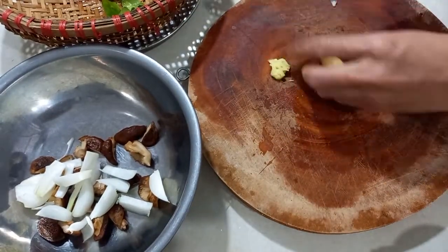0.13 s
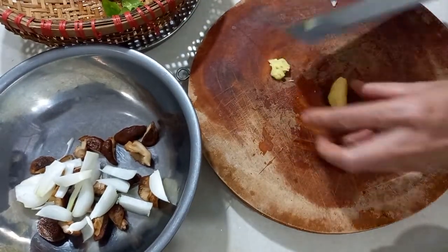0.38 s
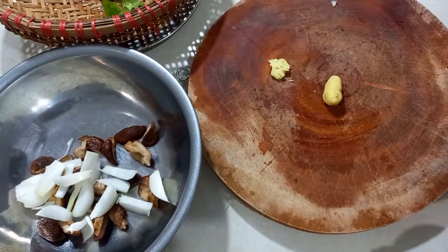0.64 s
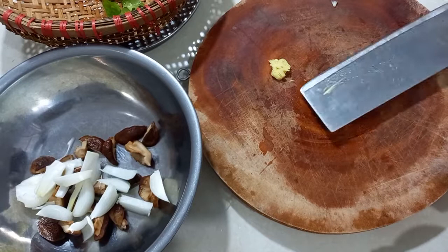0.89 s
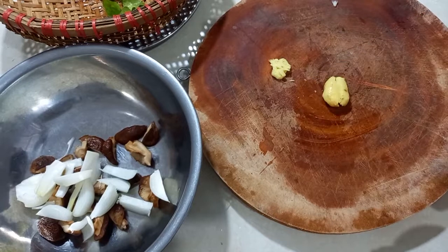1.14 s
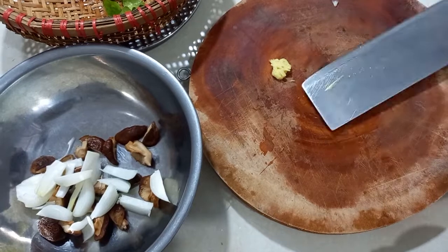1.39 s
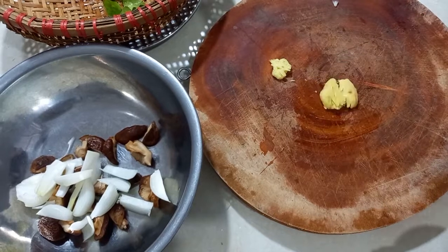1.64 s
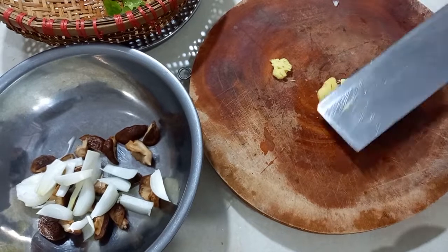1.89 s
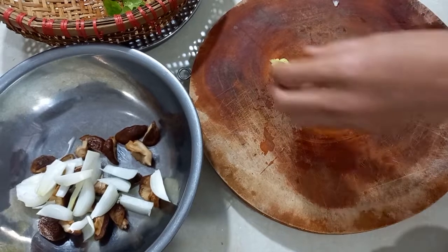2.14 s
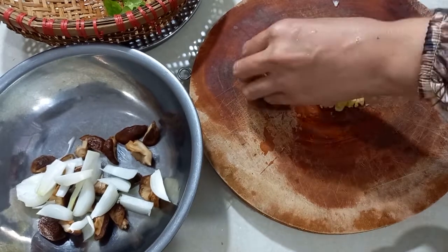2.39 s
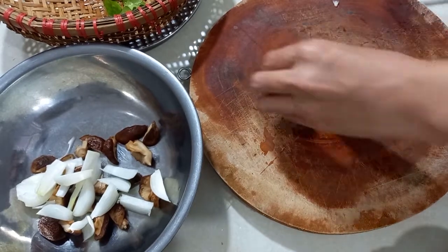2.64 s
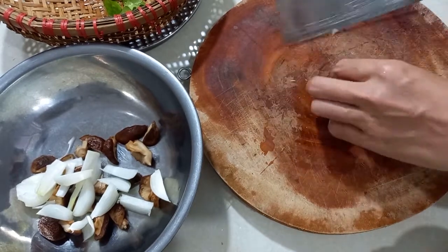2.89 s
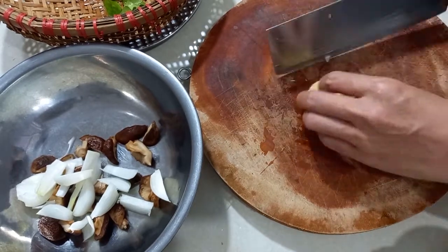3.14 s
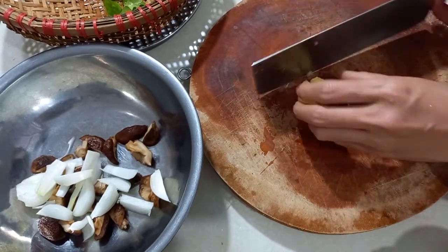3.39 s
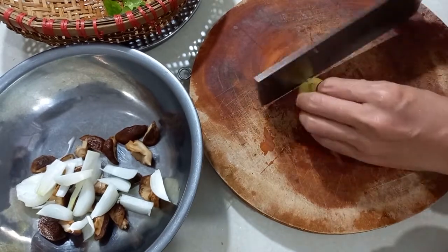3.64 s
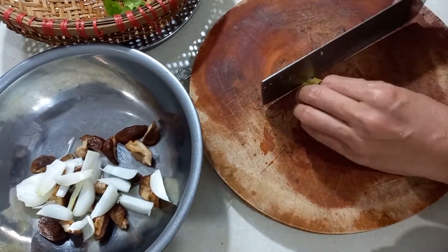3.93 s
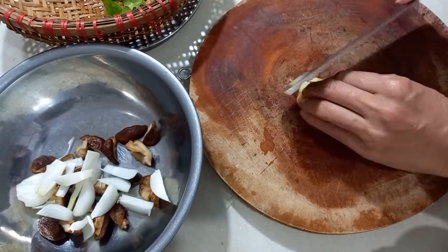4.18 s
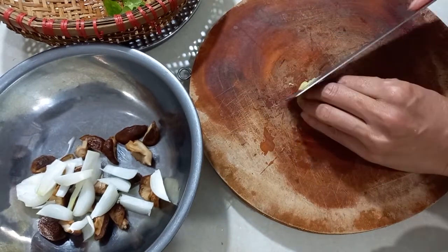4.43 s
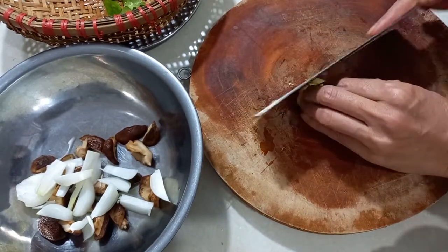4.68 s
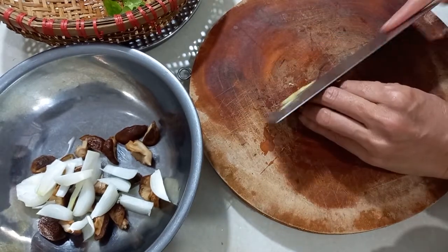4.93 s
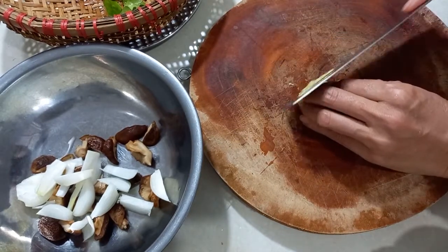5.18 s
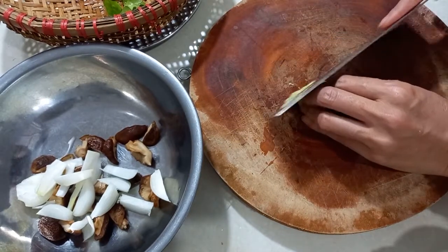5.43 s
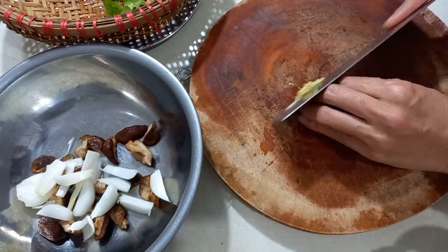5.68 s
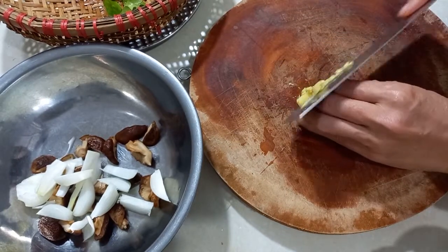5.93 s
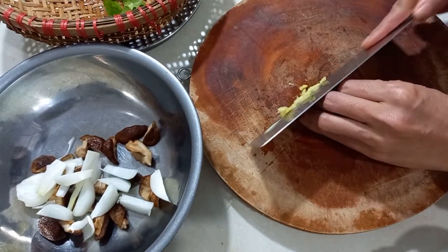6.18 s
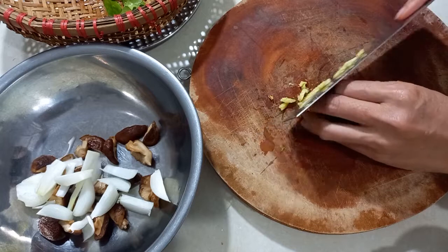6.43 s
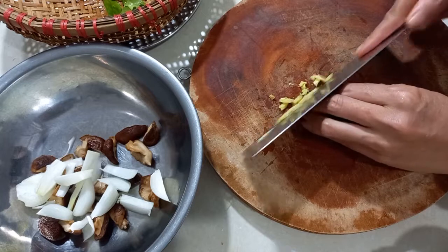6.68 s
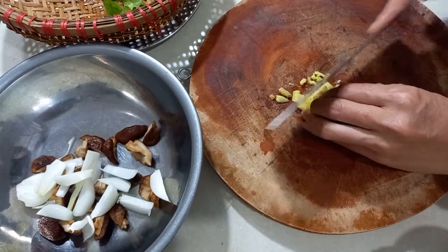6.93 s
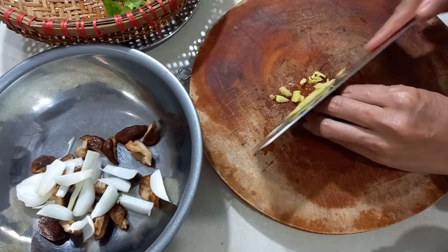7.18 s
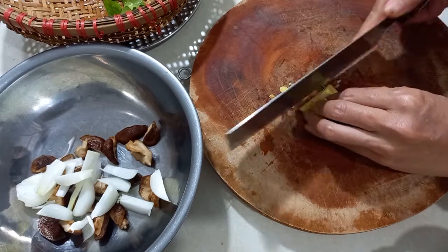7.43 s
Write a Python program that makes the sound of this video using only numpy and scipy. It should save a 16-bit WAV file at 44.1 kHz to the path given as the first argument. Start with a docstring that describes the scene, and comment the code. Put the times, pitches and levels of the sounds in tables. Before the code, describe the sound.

A close microphone in a hard, echoing home kitchen picks up a heavy blade smacking root three times, booming through the worktop. Then come irregular light taps and scuffing fingers, a few tiny crackles, and deliberate slices about half a second apart, each a crisp crunch into a woody knock. Behind it, engines hum, tyres hiss and low rumble swells, strongest near the end.

```python
"""A cleaver works on ginger on a thick wooden board in a hard-walled home kitchen.
Three slaps with the flat of the blade crush the root (ringing steel and wood, noise spray, worktop thump),
fingers wipe the blade (shaped noise), then slow cuts crunch through the fibres (random snaps), with knocks
on the wood (struck modes). Engines, tyres and rumble (wavering tones, noise) drone outside."""
import sys
import numpy as np
from scipy import signal
from scipy.fft import rfft, irfft
from scipy.io import wavfile

SR = 44100
rng = np.random.default_rng(int(sys.argv[2]) if len(sys.argv) > 2 else 0)


def store_wav(level_fs):
    """Save 16-bit WAV to argv[1]."""
    pcm = np.round(np.clip(np.atleast_2d(level_fs), -1, 1) * 32767)
    wavfile.write(sys.argv[1], SR, pcm.T.astype(np.int16))


def ratio_of_db(decibels):
    """Turn decibels (scalar or array-like) into linear amplitude factors; 0 dB maps to 1."""
    return 10 ** (np.asarray(decibels, float) / 20)


N = 333837


def rms_one(x):
    """Scale to unit rms."""
    return x / np.sqrt(np.mean(x ** 2) + 1e-20)


def in_time(rows):
    """Columns of a curve at every sample; first column is time_s."""
    s, *columns = np.transpose(rows)
    return [np.interp(np.arange(N) / SR, s, c) for c in columns]


def at_hz(points, hz):
    """Read a spectrum on a log-frequency axis."""
    points = np.array(points)
    return np.interp(np.log(hz), np.log(points[:, 0]), points[:, 1])


def filtered(x, order, hz, kind):
    """Butterworth filter."""
    return signal.sosfilt(signal.butter(order, hz, kind, fs=SR, output="sos"), x)


def equalised(x, spectrum):
    """Signal weighted by a spectrum in dB."""
    hz = np.arange(N // 2 + 1) * SR / N + 1
    return irfft(rfft(x) * ratio_of_db(at_hz(spectrum, hz)), N)


def colour(x, spectrum):
    """Noise shaped to a spectrum, rms 1."""
    return rms_one(equalised(x, spectrum))


# left-right correlation of noise: pitch_hz, correlation
LIKENESS = [(60, 0.94), (180, 0.88), (550, 0.29), (1650, 0.0), (4970, -0.01), (15000, 0.03)]


def stereo_noise(length):
    """White noise whose channels agree in the bass and part in the treble."""
    mid, side = rfft(rng.standard_normal((2, length)))
    hz = np.arange(len(mid)) * SR / length + 1
    alike = np.clip(at_hz(LIKENESS, hz), -1, 1)
    shared = np.sqrt(1 + alike) * mid
    apart = np.sqrt(1 - alike) * side * [[1], [-1]]
    return irfft(shared + apart, length) / np.sqrt(2)


def drift(rate_hz):
    """Slow chance: noise through two equal low-pass poles, rms 1."""
    r = np.exp(-2 * np.pi * rate_hz / SR)
    slow = signal.lfilter([1], [1, -2 * r, r * r], rng.standard_normal(N + SR))
    return rms_one(slow[SR:])


def waver(hz, rate_hz):
    """Tone whose height and phase wander, a little differently left and right; mid rms 1."""
    turn = 2 * np.pi * np.cumsum(hz) / SR
    mid, side = (drift(rate_hz) * np.cos(turn) + drift(rate_hz) * np.sin(turn) for part in range(2))
    return mid + ratio_of_db(-12) * side * [[1], [-1]]


def ring(drive, hz, t60_s):
    """Two-pole resonator: a unit click sets a sine of height 1 ringing."""
    r, w = ratio_of_db(-60 / (t60_s * SR)), 2 * np.pi * hz / SR
    return signal.lfilter([0, np.sin(w)], [1, -2 * r * np.cos(w), r * r], drive + 1e-18)


def clicks(s, db):
    """Single samples at given moments."""
    out = np.zeros(N)
    np.add.at(out, np.round(np.asarray(s) * SR).astype(int), ratio_of_db(db))
    return out


def dying(drive, t60_s):
    """Envelope that jumps at each click and decays."""
    return signal.lfilter([1], [1, -ratio_of_db(-60 / (t60_s * SR))], drive + 1e-18)


def grains(per_s, spread_db):
    """Dense random snaps of uneven size, rms 1."""
    sizes = ratio_of_db(spread_db * np.minimum(rng.exponential(1, (2, N)), 5))
    signs = rng.choice([-1, 1], (2, N))
    return rms_one(sizes * signs * (rng.random((2, N)) < per_s / SR))


TOUCH_S = .003


def strokes(rows, fade_db_per_s):
    """Strokes set in over TOUCH_S, move evenly in dB, then fade; returns gain and the shares passed on."""
    t, out = np.arange(N) / SR, 0
    for start_s, end_s, start_db, end_db, *share_db in rows:
        level_db = np.interp(t, [start_s, end_s], [start_db, end_db])
        level_db = level_db - fade_db_per_s * np.maximum(t - end_s, 0)
        gain = np.clip((t - start_s) / TOUCH_S, 0, 1) * ratio_of_db(np.maximum(level_db, -200))
        out = out + gain * ratio_of_db([0, *share_db])[:, None]
    return out


# street levels: time_s, drone_db, rumble_rel_db
STREET = [(0, -66, -73), (.12, -59, -68.5), (.5, -70, -62.5), (.72, -45, -59.5), (2.45, -69, -71.5),
          (2.7, -63, -69), (3.3, -59, -61.5), (3.73, -45.5, -63.5), (4.06, -60, -67.5), (4.4, -47.5, -61.5),
          (4.65, -50, -57.5), (5.15, -66, -61), (5.45, -53, -53), (5.85, -43.5, -57.5), (6.27, -50, -59.5),
          (6.6, -37, -56), (6.82, -52.5, -59), (7.15, -31, -47.5), (7.57, -68, -46)]
# noise levels: time_s, tyre_db, treble_hiss_db
AIR = [(0, -77.5, -88), (.4, -72.5, -76), (.74, -64.5, -59), (2.5, -77.5, -73), (3.9, -73, -75),
       (4.3, -69, -71.5), (5.5, -86.5, -69), (6.45, -79, -66.5), (6.95, -59.5, -71), (7.57, -64, -72)]
# passing engine: time_s, pitch_hz, level_rel_db
ENGINE = [(6.8, 295, -83), (7.14, 295, -46), (7.38, 296, -50), (7.57, 322, -56)]
# passing engine's partials: multiple, level_rel_db, waver_hz
ENGINE_ORDERS = [(.51, 9.5, 2.4), (1.0, 6.5, 2.7), (1.15, -7, 3.2)]
# idling engine that swells, then fades: time_s, level_rel_db
IDLE = [(0, -71), (.2, -59), (.7, -52.5), (2.2, -59.5), (2.6, -72.5)]
# idling engine's partials: multiple of firing rate, level_rel_db
IDLE_ORDERS = [(3, -3), (4, -3.5), (5, 5.5), (6, -1)]
# rumble spectrum: pitch_hz, level_rel_db
RUMBLE = [(18, -61), (30, -39), (46, -24.5), (123, -7.5), (156, -18.5), (288, -26), (328, -23.5),
          (900, -54.5), (1170, -72), (1980, -120)]
# tyre spectrum: pitch_hz, level_rel_db
TYRES = [(350, -44), (600, -7.5), (685, -7), (927, -15.5), (1700, -10.5), (2640, -19.5), (5000, -29.5),
         (6500, -56.5), (11000, -120)]
# treble hiss spectrum: pitch_hz, level_rel_db
HISS = [(2500, -38.5), (3500, -14), (6500, -11.5), (7700, -9), (8400, -4), (11000, -13), (13000, -10.5),
        (15800, -18.5)]
DRONE_HZ, DRONE_WANDER_HZ, IDLE_FIRING_HZ = 122.7, 2.5, 26.3


def street():
    """Wavering engine drone, idling and passing engine tones; noise for rumble, tyres and treble hiss."""
    drone_db, rumble_db = in_time(STREET)
    tyre_db, hiss_db = in_time(AIR)
    engine_hz, engine_db = in_time(ENGINE)
    idle_db, = in_time(IDLE)
    fade_in = np.clip((np.arange(N) / SR - ENGINE[0][0]) / .1, 0, 1)
    engine = fade_in * sum(ratio_of_db(engine_db + db) * waver(k * engine_hz, rate_hz)
                           for k, db, rate_hz in ENGINE_ORDERS)
    idle = sum(ratio_of_db(idle_db + db) * waver(np.full(N, k * IDLE_FIRING_HZ), 1.5) for k, db in IDLE_ORDERS)
    rumble = ratio_of_db(rumble_db + 12.0) * colour(stereo_noise(N), RUMBLE)
    tyres = ratio_of_db(tyre_db) * colour(stereo_noise(N), TYRES)
    hiss = ratio_of_db(hiss_db) * colour(stereo_noise(N), HISS)
    drone = ratio_of_db(drone_db) * waver(DRONE_HZ + DRONE_WANDER_HZ * drift(1.5), 8.0)
    return drone + engine + idle + rumble + tyres + hiss


# flat of the blade on the root: start_s, slap_rel_db, thump_rel_db, spray_delay_s
SLAPS = [(0.761, 6.5, 3.5, 0.0046), (1.284, 3, 4.5, 0.0052), (1.744, 6.5, 2, 0.0023)]
# blade modes: pitch_hz
BLADE_HZ = [690, 1100, 2164, 2255, 2375, 2650, 2834, 3418, 5720, 5684, 7243, 8240, 9185, 10100, 10885,
            11780, 13500, 14100]
# same modes: struck_rel_db, wiped_rel_db, longest_t60_s
BLADE = [(-0.5, -21.5, 0.037), (-12.5, -29, 0.049), (-7, -17, .2), (-3.5, -23, .05), (-7.5, -5, .1),
         (-7, -5, .05), (-8.5, -13, .1), (-11, -18.5, .08), (-8.5, -21, .2), (-11, -16.5, .15),
         (-13.5, -22.5, .08), (-9.5, -21.5, .1), (-4.5, -4, .06), (-9, -26, 0.087), (-7.5, -22, .11),
         (-4, -6, .1), (-4, -4, 0.051), (-12, -3.5, .07)]
GRIP_CYCLES = 800  # the grip limits each mode's t60 to this many cycles


def blade(wiping):
    """Slaps rattle the hand-damped steel with short noise bursts; rubbing stirs the same modes."""
    s, slap_db, _, delay_s = np.transpose(SLAPS)
    rattle = dying(clicks(s + delay_s, slap_db - 18.5), 0.068) * stereo_noise(N)
    # a previous slap is just dying away
    earlier = dying(clicks([0], -80.5), 0.39) * rng.standard_normal(N)
    out = ring(earlier, 2280, 0.028)
    for hz, (struck_db, wiped_db, t60_s) in zip(BLADE_HZ, BLADE):
        drive = ratio_of_db(struck_db) * rattle + ratio_of_db(wiped_db) * wiping
        out = out + ring(drive, hz, min(t60_s, GRIP_CYCLES / hz))
    return out


# spray spectrum: pitch_hz, density_rel_db_per_hz
SPRAY = [(88, -36), (150, -7.5), (464, -9), (1140, -0.5), (1520, -6), (2210, -4.5), (2480, -1.5),
         (2680, -4), (12000, -12.5), (15800, -3)]
# worktop modes: pitch_hz, level_rel_db, t60_s, first_swing_sign
WORKTOP = [(61, -2.5, 0.19, 1), (83, 0, 0.15, -1), (128.4, -9.5, 0.37, 1), (235.5, -13.5, 0.76, 1)]
THUMP_LAG_S = 0.0015  # the worktop shakes the right side a little later
FIRST_SPRAY_REL_DB = -7  # the skin splits at first contact, before the main spray


def slaps():
    """The blade knocks the wood, the root bursts in a spray of noise, and the whole worktop thumps."""
    s, slap_db, thump_db, delay_s = np.transpose(SLAPS)
    wood = sum(swing * ring(clicks(s, slap_db + mode_db), hz, .02)
               for hz, mode_db, swing in [(1100, -11.0, -1.2), (2460, -6.5, -0.38)])
    splits = clicks(s + delay_s, slap_db + 5.5) + clicks(s, slap_db + FIRST_SPRAY_REL_DB)
    spray = dying(splits, 0.28) * colour(stereo_noise(N), SPRAY)
    push = filtered(clicks(s + 0.0014, thump_db) + 1e-18, 2, [45, 200], "band")
    thump = sum(np.sign(swing) * ratio_of_db(db) * ring(push, hz, t60_s) for hz, db, t60_s, swing in WORKTOP)
    sides = np.array([thump, np.roll(thump, round(THUMP_LAG_S * SR))])
    return wood + spray + sides * ratio_of_db([[2.0], [-2.5]])


# edge or heel on the board: start_s, peak_rel_db, weight_db, hardness_db
KNOCKS = [(2.594, -21, 8.5, 20), (2.825, -35, 17, 0.5), (2.866, -18.5, 10.5, 8), (2.913, -14.5, 1.5, -1),
          (3.062, -43, -5, -2), (3.09, 0, -13.5, -21), (3.282, -27, 20, -12), (3.298, -12.5, 4, -17),
          (3.326, -23.5, 16.5, -21), (3.341, -17, 7, -8), (4.471, 7, 0, -9), (4.911, -21, 20, -10),
          (5.233, 11, 1, -12.5), (5.674, 4, 2, -12), (6.112, -12, 12.5, 1), (6.637, -19.5, 18.5, 16.5),
          (7.198, -15, 17.5, 6.5), (7.541, -44, 13, 1)]
# board modes: pitch_hz, level_rel_db, t60_s
BOARD = [(231.4, -13, 0.13), (476.7, -4, 0.03), (656.3, -3, 0.038), (926, -11, 0.11), (1004, 2, 0.026),
         (1076, -6.5, 0.023), (1217, -5.5, 0.0083), (1625, -16, 0.048), (1832, -18.5, 0.023),
         (2090, -14, 0.016), (3060, -21.5, 0.0054), (4310, -41, 0.014)]
# direction of each board mode's first swing: sign
BOARD_SIGNS = [1, -1, 1, -1, -1, -1, 1, -1, 1, -1, 1, -1]
# clatter spectrum: pitch_hz, level_rel_db
CLATTER = [(600, -25), (1500, 3), (2300, -8), (3800, -18.5), (6000, -27), (15000, -32)]


def board(rubbing):
    """Heavy knocks favour the low modes, hard ones the high; rubbing drives the same modes."""
    s, peak_db, weight_db, hard_db = np.transpose(KNOCKS)
    chance_db, out = rng.normal(0, 1.5, (len(s), len(BOARD))), np.zeros(N)
    for k, (hz, mode_db, t60_s) in enumerate(BOARD):
        low, high = np.clip(np.log2(900 / hz), 0, 1), np.clip(np.log2(hz / 1200), 0, 1)
        blows = clicks(s, peak_db - 10 + weight_db * low + hard_db * high + chance_db[:, k])
        # wood yields, so the push builds up
        push = filtered(blows + rubbing + 1e-18, 4, max(1.4 * hz, 1400), "low")
        out += BOARD_SIGNS[k] * ratio_of_db(mode_db) * ring(push, hz, t60_s)
    crack = dying(clicks(s + 0.00055, peak_db + hard_db - 22.0), 0.006)
    crack = crack * colour(rng.standard_normal(N), CLATTER)
    return filtered(out, 2, 170, "high") + crack


def shudder():
    """Decaying envelope of the board shuddering on the worktop after each knock."""
    s, peak_db = np.transpose(KNOCKS)[:2]
    return dying(clicks(s, peak_db - 28.5), 0.37)


# fingers on blade and root: start_s, leave_s, start_db, leave_db, to_blade_rel_db, to_board_rel_db
WIPES = [(2.594, 2.61, -52.5, -55, -0.5, 20.5), (2.69, 2.804, -69, -44, 9, -6.5),
         (3.07, 3.2, -65.5, -67, -4, 1), (3.215, 3.3, -65, -64.5, 2, 2),
         (3.47, 3.5, -66.5, -61.5, -10, -24), (3.6, 3.652, -76, -62, -22, -16)]


def wipes():
    """Finger friction envelopes: rustle, share to the blade, share to the board."""
    return strokes(WIPES, fade_db_per_s=259)


# edge breaks skin, fingers unstick: start_s, peak_rel_db, t60_s
TICKS = [(3.485, -42.5, 0.046), (3.573, -45, 0.03), (3.5995, -49, 0.025), (3.6202, -44.5, 0.03),
         (3.6429, -38, 0.031), (3.71, -38.5, 0.03), (3.7706, -47, 0.035), (4.0946, -46.5, 0.014),
         (4.37, -38.5, 0.037), (4.8416, -27, 0.068), (5.1994, -22.5, 0.03), (5.4485, -41, 0.036),
         (5.5962, -33.5, 0.027), (5.9986, -27, 0.05), (7.002, -36, 0.025)]
# crunch spectrum: pitch_hz, level_rel_db
CRUNCH = [(900, -25), (1500, 1.5), (2200, -5), (3300, -8.5), (4600, -6.5), (6300, -8.5), (7600, -6),
          (8400, 0.5), (9400, -6.5), (11900, -2), (15800, -4.5)]


def ticks():
    """Short bright crackles of dense random snaps, and their envelope."""
    envelope = sum(dying(clicks([s], peak_db - 4.0), max(t60_s, .004)) for s, peak_db, t60_s in TICKS)
    crackle = filtered(colour(grains(10000, 4.4), CRUNCH), 2, 6800, "high")
    return envelope * crackle, envelope


# edge crushes fibres on its way to the board: start_s, end_s, start_db, end_db, to_board_rel_db
CUTS = [(4.395, 4.472, -57.5, -28, -24), (4.865, 4.91, -45.5, -24, -3.5), (5.212, 5.236, -53.5, -26, -24),
        (5.622, 5.676, -35.5, -26.5, -1), (6.054, 6.113, -32, -27, -3), (6.562, 6.605, -38.5, -25.5, -2),
        (7.106, 7.17, -35.5, -22, -5)]
PRESS_S, PRESS_FIRST_REL_DB, PRESS_LAST_REL_DB = .055, -28, -14.5  # levels relative to the cut's start


def cuts():
    """The edge presses on the skin, then crushes the fibres: envelope and share to the board."""
    presses = [(s - PRESS_S, s, db + PRESS_FIRST_REL_DB, db + PRESS_LAST_REL_DB, share_db)
               for s, _, db, _, share_db in CUTS]
    return strokes(CUTS + presses, fade_db_per_s=1816)


# softer crunch or rub following each cut, sometimes before the knock:
# start_s, end_s, start_db, end_db, to_board_rel_db
AFTER_CRUNCHES = [(4.475, 4.575, -49.5, -33.5, -5.5), (4.912, 4.992, -33.5, -38, -3.5),
                  (5.24, 5.348, -46, -40.5, 4), (5.68, 5.72, -41.5, -34.5, -17),
                  (6.115, 6.192, -36.5, -40, -9.5), (6.605, 6.635, -37.5, -29, -3),
                  (7.175, 7.205, -28, -28, -4)]


def after_crunches():
    """Crunch or rub that follows each cut and fades more slowly: envelope and share to the board."""
    return strokes(AFTER_CRUNCHES, fade_db_per_s=297)


# decay by the walls alone: pitch_hz, t60_s
ROOM_T60 = [(60, 0.35), (160, 0.75), (420, 0.62), (750, 0.91), (1010, 0.72), (1350, 0.75), (2900, 0.92),
            (6000, 0.92)]
# tail spectrum: pitch_hz, level_rel_db
ROOM_DB = [(60, -3), (250, -0.5), (1000, 1.5), (4000, 0), (15000, 2)]
# near surfaces: delay_s, left_db, right_db
ECHOES = [(.0052, -5, -22), (0.0173, -24.5, -8)]
CORNER_REL_DB, CORNER_T60_S = 6.5, 0.25  # worktop corner: a louder, shorter first tail
AIR_LOSS_DB_PER_S = 42  # at 10 kHz, rising with the square of pitch


def kitchen(x):
    """Two near echoes, and a diffuse tail that swells in and dies, air loss taking the treble first."""
    length = round(1.3 * SR)
    hz, t, white = signal.stft(stereo_noise(length), SR, nperseg=512)
    hz = hz[:, None] + 1
    late = ratio_of_db(-t * (60 / at_hz(ROOM_T60, hz) + AIR_LOSS_DB_PER_S * (hz / 10000) ** 2))
    fall = late * (1 + ratio_of_db(CORNER_REL_DB - 60 * t / CORNER_T60_S))
    # equal energy per band before the tail spectrum
    fall *= ratio_of_db(at_hz(ROOM_DB, hz)) / np.sqrt(np.sum(fall ** 2, axis=1, keepdims=True) * 256)
    tail = signal.istft(white * fall, SR, nperseg=512)[1][:, :length]
    tail *= 1 - np.exp(-np.arange(length) / SR / 0.031)
    for s, left_db, right_db in ECHOES:
        tail[:, round(s * SR)] += ratio_of_db([left_db, right_db])
    return signal.fftconvolve(x, tail, axes=1)[:, :N]


def scene():
    """Everything on the board sounds in the kitchen; the street comes in as it is."""
    crush, cut_to_board = cuts()
    after, after_to_board = after_crunches()
    crunch = crush + after
    rustle, wipe_to_blade, wipe_to_board = wipes()
    # fibres give way in clumps
    fibres = grains(9000, 2.4) * ratio_of_db(2.5 * drift(60))
    scuff = rng.standard_normal(N) * ratio_of_db(2.0 * drift(75))
    bright = (crunch + rustle) * colour(fibres, CRUNCH)
    crackle, tick = ticks()
    # the thin edge stirs mainly the board's modes above 760 Hz
    edge = filtered((cut_to_board + ratio_of_db(-16) * tick) * scuff, 3, 760, "high")
    rubbing = edge + (after_to_board + wipe_to_board + shudder()) * scuff
    wood = board(ratio_of_db(-20.5) * rubbing)
    stirring = (wipe_to_blade + ratio_of_db(-9.5) * crunch) * stereo_noise(N)
    steel = blade(ratio_of_db(-32.0) * stirring)
    # loose pieces tumble under the hand
    bits = ratio_of_db(-2.0) * wipe_to_board * colour(fibres, CLATTER)
    blows, crisp = wood + steel + slaps() + bits, bright + crackle
    # crisp sounds point up at the listener and feed the room less
    return blows + crisp + kitchen(blows + ratio_of_db(-6.0) * crisp) + street()


def roll_off(x):
    """The treble ends steeply here."""
    return signal.sosfilt(signal.butter(12, 15990, fs=SR, output="sos"), x)


# microphone response: pitch_hz, level_db
MICROPHONE = [(5600, -1), (6500, -2), (7600, 1), (8300, 2), (14000, -0.5), (15800, -5.5)]


def record(dry):
    """Microphone colour; gain control ducks under loud blows and creeps back; peaks still overload."""
    dry = equalised(dry, MICROPHONE)
    keep = np.exp(-1 / (0.014 * SR))
    power = signal.lfilter([1 - keep], [1, -keep], np.mean(dry ** 2, axis=0))
    level_db = 10 * np.log10(power + 1e-12)
    creep_db = 22 * np.arange(N) / SR  # recovery, 22 dB per s
    wanted_db = 0.55 * np.maximum(level_db + 12.5, 0)
    duck_db = np.maximum.accumulate(wanted_db + creep_db) - creep_db
    held, top = dry * ratio_of_db(-duck_db), 1.03
    mix = held / (1 + np.abs(held / top) ** 6) ** (1 / 6)
    return roll_off(mix)


dry = scene()
out = record(dry)
store_wav(out)
```